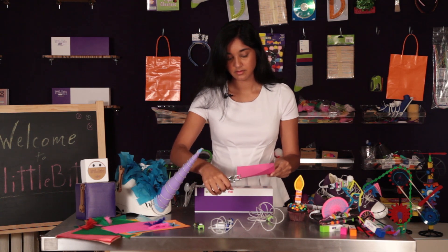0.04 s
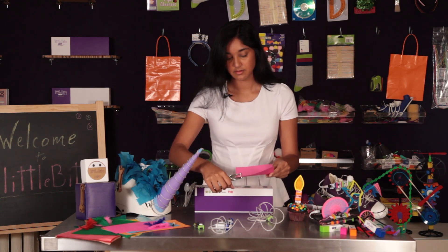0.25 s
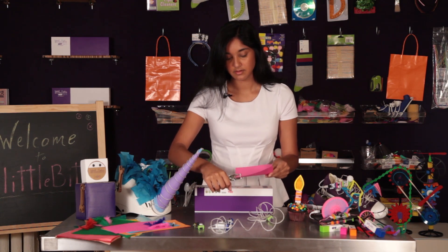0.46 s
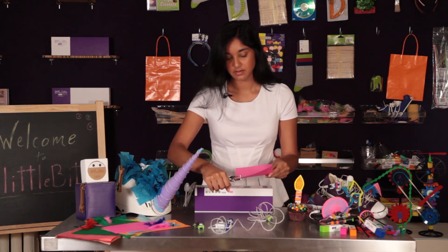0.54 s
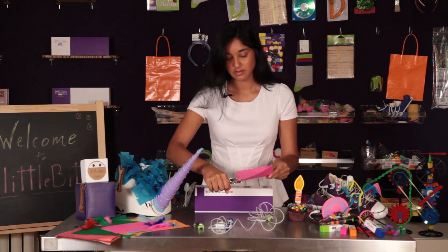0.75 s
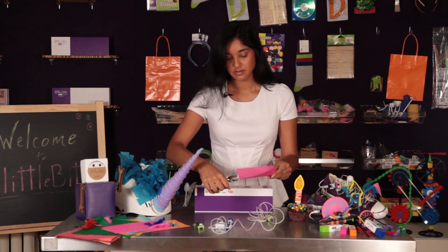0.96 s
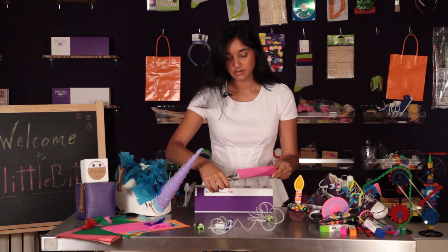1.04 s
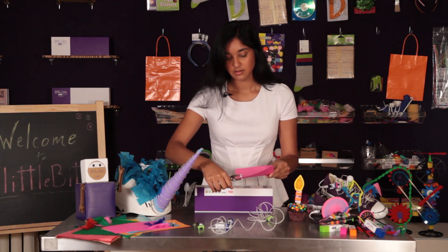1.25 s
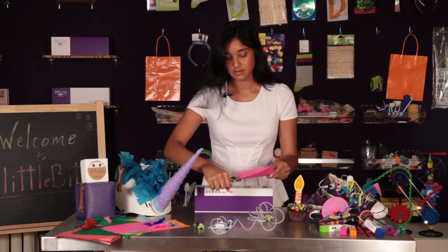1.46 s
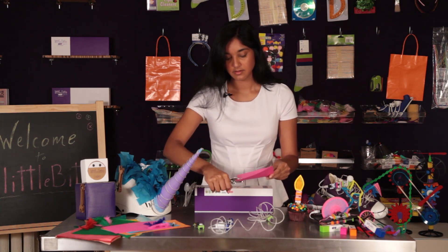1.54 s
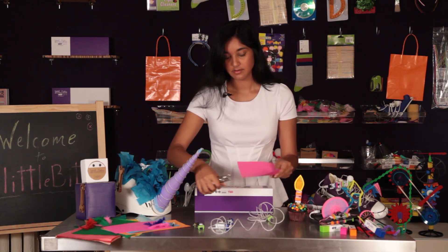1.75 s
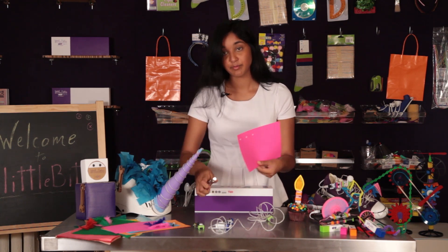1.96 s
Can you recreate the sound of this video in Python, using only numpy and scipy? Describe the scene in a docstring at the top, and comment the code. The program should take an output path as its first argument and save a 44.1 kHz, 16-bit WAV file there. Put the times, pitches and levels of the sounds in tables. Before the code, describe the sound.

Two sharp metallic clicks of a hole punch cutting paper, each followed by a softer papery pop, in a quiet room.

```python
"""Stiff paper pops off the pin of a steel plier punch, close by in a small, quiet studio.
The sheet slides on and two holes are punched. At each squeeze the pin cracks through the fibres
and the sheet twangs; then the jaws snap shut and the impact sets the handles ringing in their modes.
On release the pin scrapes out of the hole and the sheet buckles free with another pop.
A short reverberation follows each sound, over a low ventilation rumble."""
import sys
import numpy as np
from scipy import signal
from scipy.fft import rfft, irfft, next_fast_len
from scipy.io import wavfile
from scipy.ndimage import uniform_filter1d

SR = 44100
rng = np.random.default_rng(int(sys.argv[2]) if len(sys.argv) > 2 else 0)


def dump(signal):
    """Clip the signal to [-1, 1] and save it as 16-bit WAV at the path in sys.argv[1]."""
    limited = np.clip(np.atleast_2d(signal).T, -1, 1)
    pcm = np.round(limited * 32767).astype(np.int16)
    wavfile.write(sys.argv[1], SR, pcm)


N = 88244

# jaw closures: (time [s], crack level [dB], clack level [dB], ring level [dB], crack decay [s])
CLOSURES = [(0.7860, -30, -30, -32.5, 0.0031), (1.5947, -31.5, -28, -35.5, 0.00061)]
# spectrum of each closure's crack: (frequency [Hz], gain [dB])
CRACK_SPECTRA = [
    [(40, 3), (150, -1), (300, -3), (650, 4.5), (1100, -1.5), (2000, -2), (2750, 4), (3950, -7),
     (4900, 0.5), (7600, -1.5), (9300, -15.5), (12500, -17.5), (16000, -36)],
    [(40, 6), (150, -6.5), (350, -11), (600, 4.5), (1100, -3.5), (1800, -1.5), (2900, -1), (3900, 1),
     (5000, -4.5), (6400, 1), (9300, -16), (12500, -18), (16000, -40)],
]
# damped modes of the jaws, set by how they meet each time: (frequency [Hz], gain [dB], T60 [s])
JAW_MODES = [
    [(2516, -14, 0.066), (2774, -2, 0.018), (3745, -2, 0.019), (4140, 4, 0.0075), (6100, -9.5, .025),
     (7000, -9.5, 0.004), (8350, -4.5, 0.0083)],
    [(2340, 5.5, 0.019), (2780, -18, 0.033), (2850, 2.5, 0.042), (3190, 12, 0.012), (4100, -21, .016),
     (5950, 4.5, 0.024), (8550, -8, 0.02)],
]
# modes of the steel handles: (frequency [Hz], gain [dB], T60 [s])
HANDLE_MODES = [(1461, -1.5, .165), (1755, -17, .17), (2070, -20, .12), (2400, -18, .1), (2666, -13, .08),
                (2870, -17, .08), (4160, -12, .11), (5325, -24, .1), (5970, -17, .06), (6480, -24, .1),
                (7830, -27, .1), (8680, -29, .12)]
def jaw_snaps():
    """Impact of steel on steel: a broadband crack, then free vibration of the jaws and handles."""
    cracks, clacks, handles = np.zeros((3, N))
    for closure, spectrum, modes in zip(CLOSURES, CRACK_SPECTRA, JAW_MODES):
        s, crack_db, clack_db, ring_db, decay = closure
        add(cracks, s, blow(colour(burst(0.00015, decay), spectrum), crack_db))
        add(clacks, s, blow(ring(modes), clack_db))
        add(handles, s, blow(ring(HANDLE_MODES), ring_db))
    return cracks, clacks, handles


# knock of the closed punch: (time [s], level [dB])
SETTLING_KNOCKS = [(0.8190, -38)]
# modes of that knock: (frequency [Hz], gain [dB], T60 [s])
SETTLING_MODES = [(548, -11, 0.12), (1090, -6.5, 0.065), (1440, 16, 0.0067), (1730, -2, 0.062),
                  (2300, 6.5, 0.019)]
def punch_settling():
    """Modal response to a soft contact: the closed punch settles with a light knock."""
    out = np.zeros(N)
    for s, db in SETTLING_KNOCKS:
        add(out, s, blow(ring(SETTLING_MODES, contact_s=0.0017), db))
    return out


# cracks in the paper: (time [s], level [dB], decay [s], centre [Hz], bandwidth [Hz])
FRACTURES = [(0.6527, -65, 0.0065, 1070, 1710), (0.6929, -49, 0.0054, 2400, 6060),
             (0.7124, -40, 0.0036, 2400, 3930), (1.5137, -60, 0.0028, 1425, 1820),
             (1.5326, -42, 0.0034, 2700, 2140), (1.5442, -40, 0.0031, 3060, 2580)]
# frequency response of the jaws: (frequency [Hz], gain [dB])
JAW_RESPONSE = [(300, 3.5), (1500, 0), (2300, -3), (2850, 1), (3450, 2), (3800, -7), (4250, -0.5),
                (5000, -17), (6000, -5), (7400, -13), (8400, -5.5), (9500, -21.5), (15000, -26)]
# tinks of the hinge pin: (time [s], level [dB], frequency [Hz], T60 [s])
HINGE_TINKS = [(0.6939, -60, 6630, 0.019), (1.545, -56.5, 5950, 0.017)]
def cutting():
    """Fracture: breaking fibres emit bursts that the jaws filter; the loaded hinge rings in one mode."""
    out = np.zeros(N)
    for s, db, decay, hz, width_hz in FRACTURES:
        crack = resonate(burst(0.00022, decay), hz, width_hz)
        add(out, s, blow(colour(crack, JAW_RESPONSE), db))
    for s, db, hz, t60 in HINGE_TINKS:
        add(out, s, blow(ring([(hz, 0, t60)]), db))
    return out


# the sheet leaves the pin:
# (time [s], tick level [dB], pop gain [dB], pitch [Hz], rebound delay [s], rebound [dB re pop])
SHEET_RELEASES = [(0.057, -47, -36, 750, 0.012, -4.5), (0.9798, -47.5, -34, 630, .0066, -2),
                  (1.7784, -46.5, -33.5, 565, 0.01, -9)]
# the pin drags out: (delay after pop [s], level [dB], rise [s], decay [s], centre [Hz], bandwidth [Hz])
PIN_DRAGS = [(0.00129, -35, 0.0038, 0.01, 1890, 2650), (0.0069, -30, 0.0021, .0043, 1850, 570),
             (0.001217, -30.5, 0.00092, 0.011, 1500, 2070)]
def releasing(tick_lead_s=.0058, settle_s=.024, settle_db=-9, rebound_ratio=1.255):
    """Elastic recoil: the hinge ticks, then the sheet pops, rebounds and settles as the pin drags out."""
    out = np.zeros(N)
    for release, (delay, drag_db, *drag_shape) in zip(SHEET_RELEASES, PIN_DRAGS):
        s, tick_db, db, hz, rebound_s, rebound_db = release
        add(out, s - tick_lead_s, blow(tick(decay=0.002), tick_db))
        add(out, s, undb(db) * pop(hz))
        for after_s, swing_db in ((rebound_s, rebound_db), (settle_s, settle_db)):
            add(out, s + after_s, undb(db + swing_db) * pop(hz * rebound_ratio))
        add(out, s + delay, blow(rub(*drag_shape), drag_db))
    return out


# spectrum of the fluttering sheet: (frequency [Hz], gain [dB])
FLUTTER_SPECTRUM = [(60, -4), (150, -12), (300, -9), (450, 2), (850, 3.5), (1400, -10.5), (3000, -17.5),
                    (8000, -63)]
def pop(hz):
    """Buckling: the sheet, too small to radiate bass, swings, flutters, crackles and rubs the pin."""
    swing = band(ring([(hz, 0, .006)]), low_hz=306, high_hz=2206)
    flutter = colour(burst(0.0013, 0.00714), FLUTTER_SPECTRUM)
    fibres = band(crackle(decay=0.0087), low_hz=2495, high_hz=7400)
    hole_edge = rub(rise=0.00052, decay=0.0034, hz=1770, width_hz=1320)
    return blow(swing, 0)[:len(flutter)] + blow(flutter, 0) + blow(fibres, -22) + blow(hole_edge, -6)


def crackle(decay, spread_db=7):
    """Acoustic emission: single fibres tear, a few much louder than the rest."""
    x = burst(0.0042, decay)
    return x * undb(spread_db * np.clip(rng.standard_normal(len(x)), -2, 2))


# spectrum of the pin rubbing on paper: (frequency [Hz], gain [dB])
FRICTION_SPECTRUM = [(120, -3.5), (400, 11.5), (2000, 2.5), (4500, -2.5), (8000, -20), (15000, -26.5)]
def rub(rise, decay, hz, width_hz):
    """Friction of the pin in the hole drives one broad resonance."""
    return colour(resonate(burst(rise, decay), hz, width_hz), FRICTION_SPECTRUM)


# blows on the bent sheet: (time [s], level [dB], lowest mode [Hz], position [0-1])
SHEET_BLOWS = [(0.7148, -47, 346.4, 0.6), (1.5461, -46, 416.5, 0.39)]
# modes of the sheet: (frequency ratio to the lowest, gain [dB], T60 [s])
SHEET_MODES = [(1, 2.5, 0.24), (1.39, 7, 0.14), (2.1, 6, 0.076), (2.8, 7.5, 0.066)]
def sheet_twangs():
    """Standing waves in the sheet as it is cut: a mode struck near one of its nodes stays quiet."""
    out = np.zeros(N)
    for s, db, hz, position in SHEET_BLOWS:
        sheet = sum(np.sin(np.pi * k * position) * ring([(hz * ratio, mode_db, t60)])
                    for k, (ratio, mode_db, t60) in enumerate(SHEET_MODES, 1))
        add(out, s, blow(band(sheet, low_hz=258, high_hz=3030), db))
    return out


def pin_entry(re_twang_db=-4.5):
    """Sliding friction: the pin rubs into each fresh hole as the sheet twangs."""
    out = np.zeros(N)
    for s, db, _, _ in SHEET_BLOWS:
        add(out, s, blow(rub(rise=0.00045, decay=0.0038, hz=780, width_hz=1300), db + re_twang_db))
    return out


# the paper moves along the jaw: (time [s], level [dB], duration [s], fall as it slows [dB/s])
PAPER_SLIDES = [(0.185, -57, .16, 78), (1.179, -62, 0.13, 25), (1.453, -76.5, 0.12, -2),
                (1.813, -62.5, 0.092, 94.5)]
# spectrum of sliding paper: (frequency [Hz], gain [dB])
PAPER_SPECTRUM = [(120, -46), (200, -22.5), (328, -7), (360, -11), (569, 0.5), (623, -9), (696, -1.5),
                  (1450, -4), (3070, -8.5), (16000, -43)]
def sliding(grain_db=3, grain_samples=44, slip_db=2.0, held_db=-84, attack_s=0.023, release_s=0.012):
    """Stick-slip friction: fibres catch on the jaw with random strength; slides swell, slow and stop."""
    noise = rng.standard_normal(N)
    strength = np.repeat(rng.standard_normal(N // grain_samples + 1), grain_samples)[:N]
    grains = noise * undb(grain_db * strength)
    slips = uniform_filter1d(rng.standard_normal(N), size=700)
    hiss = colour(grains * undb(slip_db * slips / np.std(slips)), PAPER_SPECTRUM)
    motion = np.full(N, undb(held_db))  # even the held sheet rustles faintly
    t = clock(1)
    for s, db, duration, slowing in PAPER_SLIDES:
        swell = 1 - np.exp(-t / attack_s)
        stop = np.exp(-np.maximum(t - duration, 0) / release_s)
        add(motion, s, undb(db - slowing * t) * swell * stop)
    return hiss / np.std(hiss) * motion


# the paper's edge touches the jaw: (time [s], level [dB])
EDGE_CONTACTS = [(1.307, -74.5), (1.315, -73), (1.861, -67.5)]
def edge_ticks():
    """Light impacts: the edge of the moving sheet ticks against the jaw."""
    out = np.zeros(N)
    for s, db in EDGE_CONTACTS:
        add(out, s, blow(tick(decay=0.00193), db))
    return out


def tick(decay):
    """A brief contact has a broad spectrum, heard as a bright tick."""
    return band(resonate(burst(0.0032, decay), hz=3150, width_hz=5900), low_hz=584, high_hz=6900)


# diffuse field of the studio: (frequency [Hz], gain [dB], T60 [s])
REVERB_BANDS = [(100, 8, 0.15), (416, 0.5, 0.35), (900, -4, 0.65), (1370, 4, 0.62), (1900, -1, 0.66),
                (3560, -8, 0.92), (6500, -6, 0.56), (14000, 3.5, 0.28)]
def room(x, tail_db=-12, build_s=0.0015, table_s=0.011, table_db=-21):
    """Reverberation: one reflection off the table and a tail in which each band has its own decay."""
    t = clock(.8)
    noise, hz = rfft(rng.standard_normal(len(t))), np.fft.rfftfreq(len(t), 1 / SR)
    points, dbs, t60s = np.transpose(REVERB_BANDS)
    response = 0
    for low in 40 * 2 ** np.arange(0, 9, .5):  # half-octave bands
        high = low * np.sqrt(2)
        centre = np.sqrt(low * high)
        part = irfft(noise * ((hz >= low) & (hz < high)), len(t))
        decay = undb(-60 * t / along(centre, points, t60s))
        response = response + part * undb(along(centre, points, dbs)) * decay
    response *= 1 - np.exp(-(t / build_s) ** 2)
    response *= undb(tail_db) / np.sqrt(np.sum(response ** 2))
    response[int(table_s * SR)] += undb(table_db)
    return signal.fftconvolve(x, response)[:N]


def lingering(db=-58, t60_s=0.72):
    """Exponential decay of a diffuse field: at the start the room still rings from an earlier snap."""
    spectrum = [(200, -3.5), (900, -2.5), (2200, 2), (4200, -7), (8000, -16), (12000, -33)]  # [Hz], [dB]
    x = colour(rng.standard_normal(N), spectrum)
    return x / np.std(x) * undb(db - 60 * np.arange(N) / SR / t60_s)


# noise floor of the studio: (frequency [Hz], gain [dB])
VENTILATION_SPECTRUM = [(15, -29), (35, 1), (60, -2.5), (85, -14), (130, -17.5), (300, -22.5), (550, -24),
                        (1000, -30.5), (2500, -40.5), (5000, -42), (16000, -46.5)]
def ventilation(db=-64):
    """Stationary broadband noise: a low ventilation rumble under a faint hiss."""
    x = colour(rng.standard_normal(N), VENTILATION_SPECTRUM)
    return x / np.std(x) * undb(db)


def burst(rise, decay):
    """Many tiny contacts sum to noise with an even spectrum; rise and decay are time constants [s]."""
    t = clock(.1)
    envelope = (1 - np.exp(-t / rise)) * np.exp(-t / decay)
    x = rng.standard_normal(len(t))
    for _ in range(2):  # flatten the spectrum, then divide the envelope out
        phase = np.angle(rfft(x * envelope))
        x = irfft(np.exp(1j * phase), len(t)) / (envelope + envelope.max() / 10)
    return x * envelope


def ring(modes, contact_s=0.0001):
    """Modal superposition: damped sines, with neighbouring modes in opposite phase."""
    t = clock(.5)
    swing = sum((-1) ** k * undb(db - 60 * t / t60) * np.sin(2 * np.pi * hz * t)
                for k, (hz, db, t60) in enumerate(modes))
    return swing * (1 - np.exp(-t / contact_s))


def resonate(x, hz, width_hz):
    """A second-order resonance."""
    return signal.lfilter(*signal.iirpeak(hz, hz / width_hz, fs=SR), x)


def band(x, low_hz, high_hz):
    """A band-pass rolls off bass and treble."""
    return signal.sosfilt(signal.butter(2, [low_hz, high_hz], "band", fs=SR, output="sos"), x)


def colour(x, spectrum):
    """Minimum-phase filter through (frequency [Hz], gain [dB]) points."""
    size = next_fast_len(2 * len(x)) * 2
    gain = undb(along(np.fft.rfftfreq(size, 1 / SR), *np.transpose(spectrum)))
    cepstrum = irfft(np.log(gain))
    cepstrum[1:size // 2] *= 2  # folding onto positive time makes the filter causal
    cepstrum[size // 2 + 1:] = 0
    return irfft(rfft(x, size) * np.exp(rfft(cepstrum)))[:len(x)]


def along(hz, points, values):
    """Interpolation on a log-frequency axis."""
    return np.interp(np.log(hz + 1), np.log(points), values)


def blow(x, db):
    """Equal-energy scaling: give a transient the energy of 10 ms at this level."""
    return x * undb(db) * np.sqrt(.01 * SR / np.sum(x ** 2))


def add(track, s, x):
    """Superposition: mix a sound into the track at time s."""
    start = max(int(s * SR), 0)
    track[start:start + len(x)] += x[:N - start]


def undb(db):
    """Decibels to amplitude ratio."""
    return 10 ** (np.asarray(db) / 20)


def clock(seconds):
    """Sample times from zero."""
    return np.arange(int(seconds * SR)) / SR


def scene():
    """Direct plus reverberant sound: each source sends its own share to the walls."""
    cuts = cutting()
    cracks, clacks, handles = jaw_snaps()
    steel = cuts + cracks + clacks
    handling = releasing() + pin_entry() + edge_ticks() + sliding()
    rings = sheet_twangs() + handles + punch_settling()
    # the room answers the steel brightly in the upper midrange
    bright = resonate(steel, hz=2100, width_hz=130)
    walls = room(cuts + undb(3) * bright + undb(1) * cracks + undb(-3.5) * clacks
                 + undb(-2) * handling + undb(-6) * rings)
    return (steel + handling + rings + walls + lingering() + ventilation())[None]


def record(dry, cutoff_hz=16200):
    """Band limiting: a steep elliptic low-pass removes the highest treble."""
    return signal.sosfilt(signal.ellip(8, .2, 70, cutoff_hz, fs=SR, output="sos"), dry)


dry = scene()
out = record(dry)
dump(out)
```